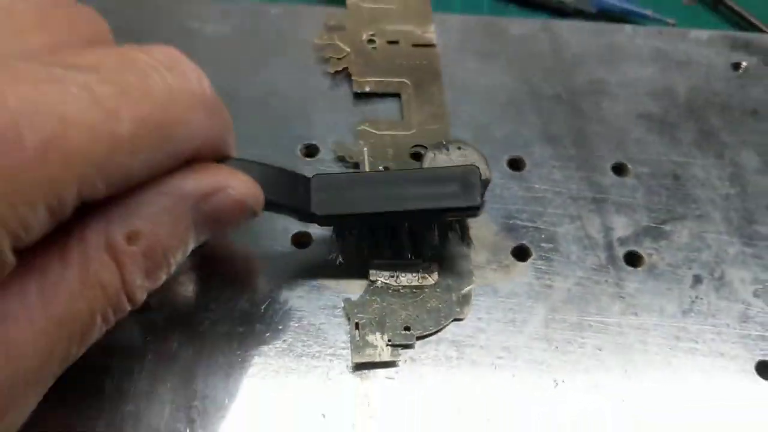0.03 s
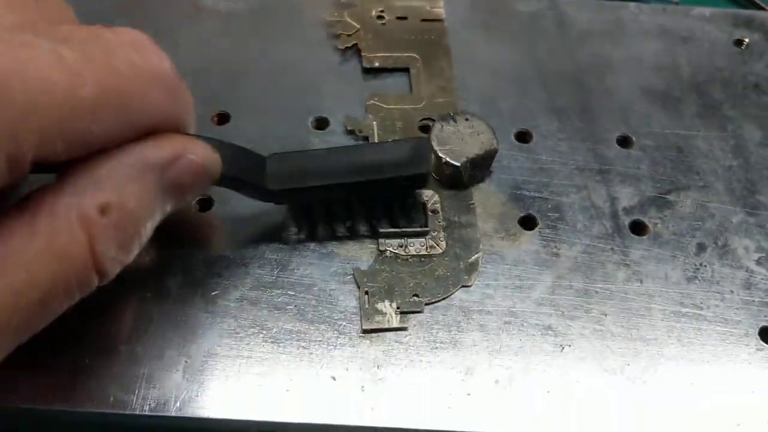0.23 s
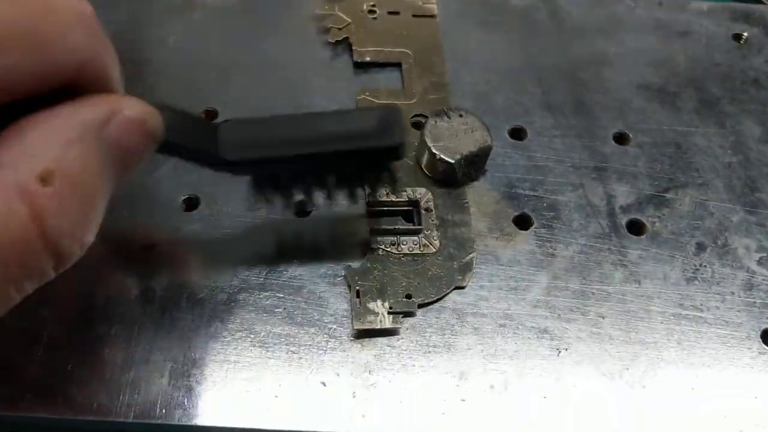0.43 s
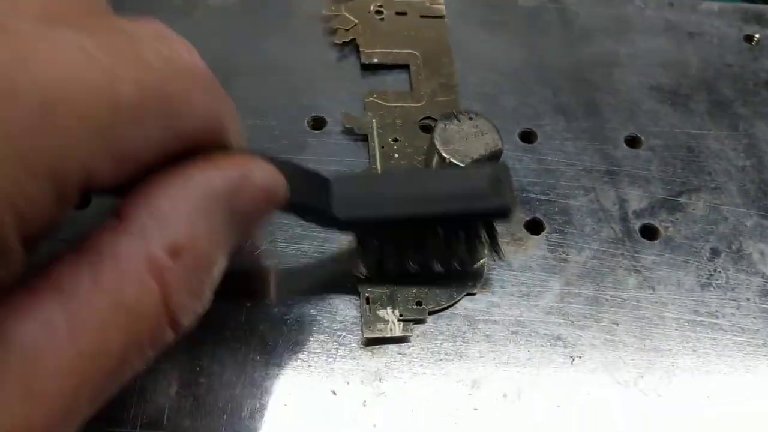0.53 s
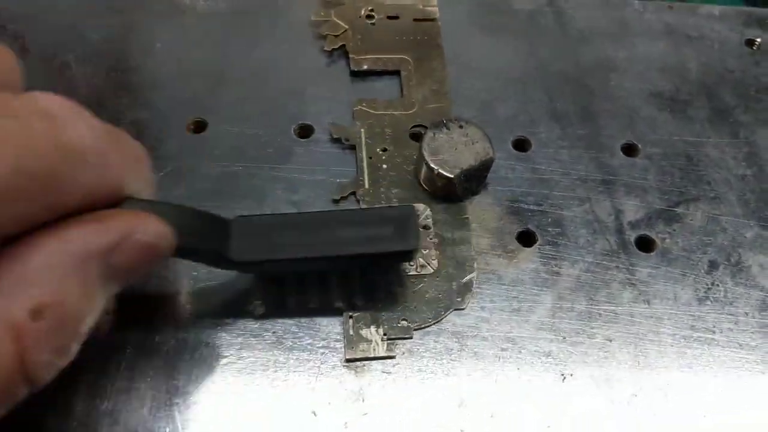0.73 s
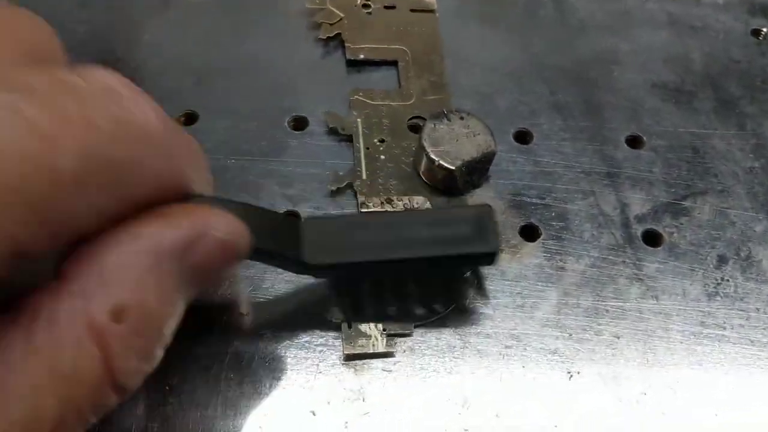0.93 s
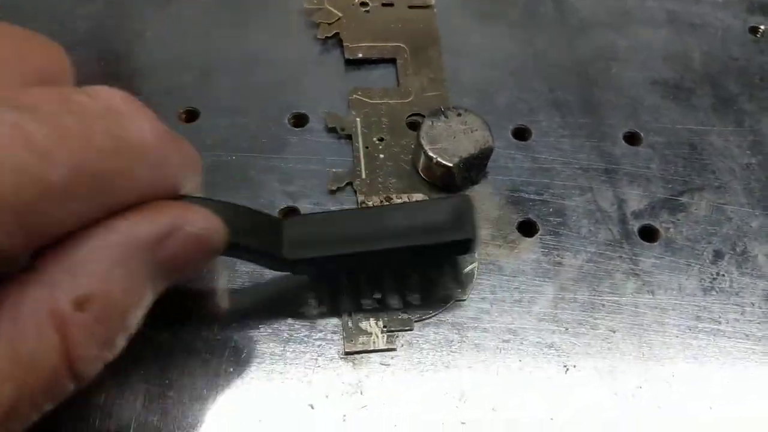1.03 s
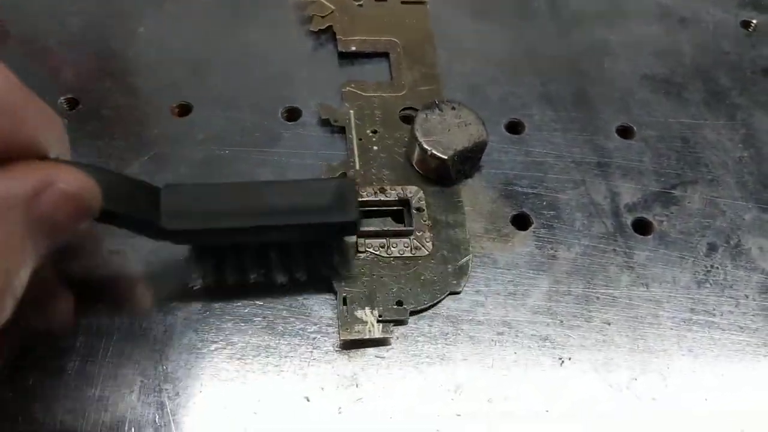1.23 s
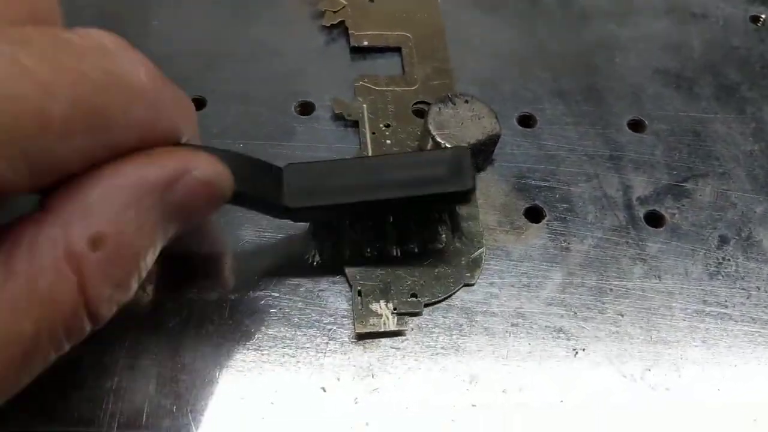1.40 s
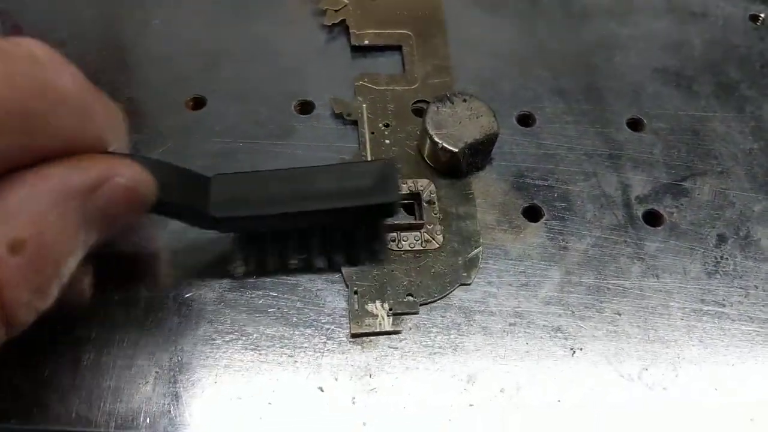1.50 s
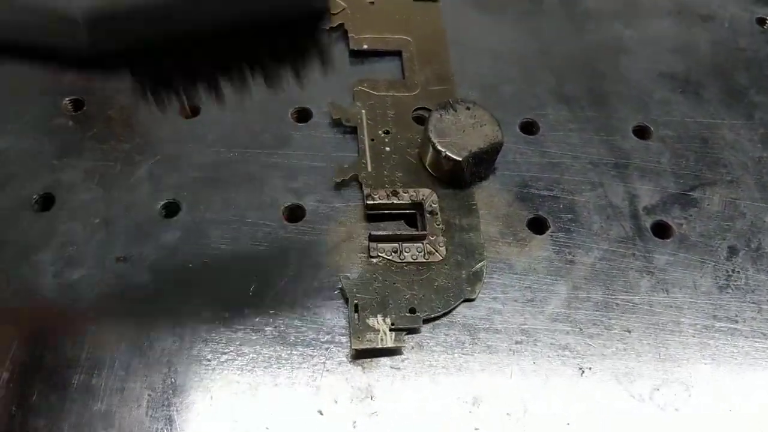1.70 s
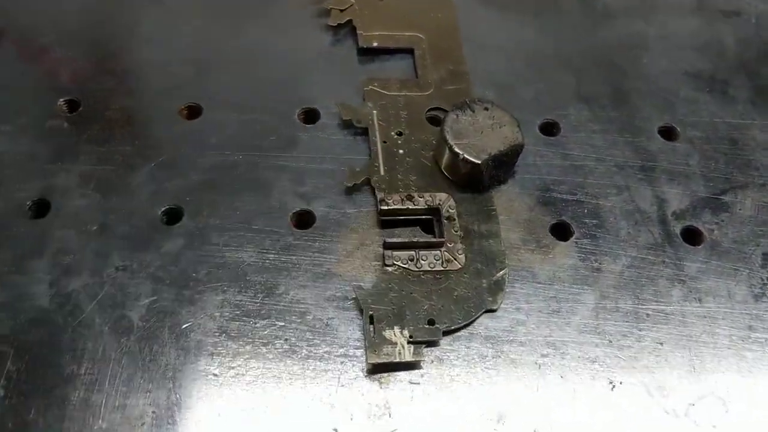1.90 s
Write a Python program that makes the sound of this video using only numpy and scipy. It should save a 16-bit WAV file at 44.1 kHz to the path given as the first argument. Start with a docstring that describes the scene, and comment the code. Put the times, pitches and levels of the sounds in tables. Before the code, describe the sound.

Bright, gritty bristle scrubbing on brass, four short strokes with faint metallic rings and bench knocks

```python
"""Brush scrubbing brass on a steel plate

A small stiff brush scrubs a brass part lying on a steel plate on a workbench: four strokes in a small quiet room.
Stick-slip of the bristles is a dense random impulse train; it ticks the bristles and drives the modes of both metals.
Single bristles snap at the edges as bright noise bursts, and now and then one ring of the metal stands out.
The hand's push rumbles, and bumps knock, through decaying modes of the bench; noise tails make the room.
"""
import sys
import numpy as np
from scipy import signal
from scipy.fft import rfft, irfft
from scipy.io import wavfile

SR = 44100
rng = np.random.default_rng(int(sys.argv[2]) if len(sys.argv) > 2 else 0)


def to_wav(s):
    """Save 16-bit WAV."""
    ch = np.atleast_2d(s).T  # columns
    pcm = np.round(np.clip(ch, -1, 1) * 32767)  # PCM
    wavfile.write(sys.argv[1], SR, pcm.astype(np.int16))


N = 85995
T = np.arange(N) / SR

# Background noise spectrum. Each row: frequency in Hz, relative level in dB.
FLOOR_SPECTRUM = [(25, -59), (45, -16), (70, 2.5), (170, -9), (350, -5.5), (700, -13.5), (1500, -15),
                  (4000, -18.5), (9000, -21.5), (16000, -28)]
# Decay of the room's tail. Each row: frequency in Hz, t60 in seconds.
ROOM_DECAY = [(200, 0.97), (1500, 0.46), (5000, 0.36), (10000, 0.38), (16000, 0.073)]
# Modes of the bench top. Each row: frequency in Hz, relative level in dB, t60 in seconds.
BENCH_MODES = [(75, -13.5, 0.1), (85, -11.5, 0.093), (134, -1, 0.071), (157.4, -4, 0.16), (201.3, -3, 0.46),
               (281, -11, 0.09), (338.3, -11.5, 0.13), (384.7, -9, 0.11), (515, -22, 0.48)]
# Modes of a bump's thud in the bench. Each row: frequency in Hz, relative level in dB, t60 in seconds.
THUD_MODES = [(153.4, -6.5, 0.22), (171, -3.5, 0.22), (204.8, -18, 0.49), (352, -17.5, 0.97),
              (555, -25, 0.9)]
# Deep sway modes of the bench. Each row: frequency in Hz, relative level in dB, t60 in seconds.
SWAY_MODES = [(66.4, 19.5, 0.17), (99.4, 7, 0.2)]
# Spectrum of a clack. Each row: frequency in Hz, relative level in dB per Hz.
CLACK_SPECTRUM = [(100, -10), (350, 0), (600, 0), (850, -4), (1300, -2), (2200, -6), (4000, -22),
                  (15000, -45)]
# The part and brush head bumping down.
# Each row: start in seconds, thud level in dB, clack level in dB, sway level of the bench in dB.
KNOCKS = [(0.119, -34, -39, -28), (.32, -23, -39, -26), (0.449, -17.5, -22.5, -34), (.495, -33, -32, -25.5),
          (.645, -32, -30.5, -19.5), (0.694, -19.5, -43, -27), (.905, -22.5, -40, -22.5),
          (0.951, -36, -32.5, -27), (1.038, -24.5, -33, -20.5), (1.25, -25.5, -54, -23),
          (1.333, -42, -27, -49), (1.392, -45, -26, -20), (1.445, -26, -39, -24),
          (1.565, -16.5, -36, -17.5), (1.621, -14, -25.5, -21), (1.645, -9, -21.5, -37),
          (1.742, -30, -33, -31)]
# The brush catches an edge and picks out one ring of the metal.
# Each row: start in seconds, level in dB, frequency in Hz, t60 in seconds.
PINGS = [(.208, -27, 3978, .1), (0.248, -25, 3978, .12), (.37, -17.5, 2318, 0.38),
         (0.449, -19.5, 1425, 0.24), (.67, -30.5, 515, 0.39), (.712, -15, 1425, 0.22),
         (0.873, -16.5, 1421, 0.21), (1.15, -18, 2318, 0.56), (1.325, -17, 3978, 0.14),
         (1.334, -23.5, 370, .2), (1.39, -26.5, 370.6, 0.18), (1.417, -17, 3978, .25),
         (1.568, -9, 1425, 0.21), (1.625, -11, 3978, .17), (1.646, -18, 1425, 0.28),
         (1.665, -25.5, 5742, 0.44), (1.835, -31, 3160, 1.2)]
# Modes of the steel plate. Each row: frequency in Hz, relative level in dB, t60 in seconds.
PLATE_MODES = [(982.2, -13, 0.47), (1391, -11, 0.6), (1425, 1, 0.27), (1480, -13.5, 1), (1950, -12.5, 0.25),
               (2077, -17.5, .2), (2318, -7, 0.55), (2583, -13.5, 0.1), (3135, -19, 0.56),
               (3978, -3.5, 0.13), (5742, -13.5, 0.47), (6713, -12, 0.26), (9600, -5, 0.19),
               (10700, -27, 0.14)]
# Modes of the brass part. Each row: frequency in Hz, relative level in dB, t60 in seconds.
BRASS_MODES = [(1662, -15.5, 0.062), (3089, -5, 0.059), (3153.5, -5.5, 0.045), (3243, -7.5, 0.047),
               (3530, -18, 0.0046), (3814, -8.5, .08), (3995, -2.5, 0.032), (4240, -10, 0.055),
               (4740, 1, 0.017), (4635, -4, 0.024), (4892, -1.5, 0.016), (5640, -9, 0.047),
               (6760, -15, 0.07), (7560, -10.5, 0.072)]
# Resonances of a bristle. Each row: frequency in Hz, half-width in Hz, lift in dB.
BRISTLE_RESONANCES = [(6660, 180, 7), (9150, 150, 10), (12000, 500, -3), (14600, 830, 4)]
# Single bristles snapping free.
# Each row: start in seconds, tick level in dB, tick pitch in Hz, kick to the brass in dB before its trim.
SNAPS = [(0.0667, -32.5, 7300, -38), (0.097, -44, 8500, -29), (.108, -29, 8500, -25),
         (0.134, -30, 7900, -44), (0.149, -45, 7600, -40), (0.2069, -15, 7740, -16.5),
         (.273, -26, 7100, -23), (0.3092, -18, 7040, -10), (0.348, -21.5, 11100, -10),
         (0.386, -18, 7950, -11), (0.4173, -17, 14100, -12), (0.438, -17.5, 13900, -16.5),
         (0.632, -28, 6940, -36), (0.643, -26.5, 9500, -48), (.659, -23, 13300, -18),
         (.698, -25, 7000, -16), (.7058, -17, 10300, -7.5), (.73, -18.5, 7050, -7),
         (0.79, -18.5, 12200, -8), (0.824, -20, 7140, -12), (0.854, -28, 10200, -32),
         (0.87, -17, 12800, -18), (1.0247, -27, 15000, -41), (1.039, -22.5, 13100, -39),
         (1.1199, -17.5, 7550, -21), (1.2443, -16.5, 11000, -38), (1.257, -15, 10950, -6.5),
         (1.279, -20, 14700, -25), (1.292, -14, 10900, -36), (1.36, -18.5, 15100, -28),
         (1.369, -20.5, 11500, -28), (1.4164, -22, 11500, -22), (1.461, -21.5, 14500, -41),
         (1.4729, -15.5, 7100, -19), (1.5105, -8.5, 10140, -16), (1.5129, -7.5, 10600, -10.5),
         (1.5642, -25, 6860, -8.5), (1.568, -16, 7100, -1.5)]
# Spectrum of a bristle's tick. Each row: frequency in Hz, relative level in dB per Hz.
CRACKLE_SPECTRUM = [(300, -19), (800, 0), (1500, -15), (2800, 3), (5300, 3.5), (6200, 10), (7200, 14),
                    (8800, 6.5), (10300, 9.5), (12500, 5), (15500, 5)]
# Four strokes, one list each; all levels are before the trims.
# Each row: time in seconds, bristle crackle in dB, drive of the brass in dB, drive of the steel plate in dB.
STROKES = [
    [(.06, -75, -71, -60.5), (.11, -55, -51.5, -50), (.165, -58, -58.5, -55), (.24, -45, -50, -59),
     (.32, -37, -37.5, -49), (.42, -42, -43, -43.5), (.46, -43, -45.5, -50), (.5, -60.5, -80, -55),
     (.6, -82, -74, -70)],
    [(.625, -83, -76, -72), (.645, -48, -52, -62), (.695, -58, -58, -45), (.72, -39.5, -36, -38.5),
     (.8, -37, -40.5, -46), (.885, -41.5, -39, -44), (.92, -50, -68, -64), (.96, -59, -74, -57.5),
     (1, -82, -74, -68)],
    [(1.02, -51, -50.5, -42.5), (1.04, -46, -44, -51), (1.085, -49.5, -51.5, -41), (1.15, -35.5, -32, -45),
     (1.26, -39.5, -42.5, -35.5), (1.285, -44, -76, -51), (1.34, -49, -55, -56), (1.37, -42.5, -51, -51),
     (1.41, -48.5, -48.5, -51), (1.495, -54, -64, -45.5)],
    [(1.51, -46, -57, -44), (1.545, -37, -42, -47), (1.57, -38, -33.5, -29.5), (1.61, -37.5, -35, -46),
     (1.64, -31.5, -42.5, -38), (1.675, -73, -62, -47.5), (1.72, -57, -91, -55.5), (1.8, -70, -79, -56)],
]

FLOOR_DB = -63
ROOM_DB, ROOM_DELAY_S = -10.5, 0.008
NEAR_DB, NEAR_T60_S, NEAR_DELAY_S = -5.5, 0.077, 0.002
RUMBLE_DB, FULL_DRIVE_DB = -55, -30.5  # rumble level where the drive of the brass is full
RUMBLE_FOLLOW = 0.25  # dB of rumble per dB of drive: it grows slowly with the push
CLACK_T60_S, THUD_RISE_S = 0.07, 0.014
KNOCK_RINGS_DB = 5  # a clack's drive of the plate, above its own level
PING_RISE_S = 0.0061
CONTACT_DB, CONTACT_S = 2, 0.025  # depth and time scale of the changing feed of each mode
MODE_RISE_S, MODE_LAG_S = 0.0004, 0.002  # swell of a mode and its longest delay
SNAP_T60_S, SNAP_PEAK_DB, SNAP_WIDTH_HZ, SNAP_LOW_HZ = 0.018, 13.5, 390, 5250
FLICKS_PER_S = 2600
FLICK_SPREAD_DB, HARDEST = 4.5, 3  # dB per unit of hardness, and the cap on hardness
CLUMP_DB, CLUMP_S = 2.5, 0.0025
BRISTLE_T60_S, BRISTLE_COLOUR_DB, BRISTLE_COLOUR_HZ = 0.009, 5, 700
TUFT_DB, TUFT_S = 2, 0.013  # different bristles take over as the brush travels
CRACKLE_DB, BRASS_DB, PLATE_DB = -6, -4.5, -4  # trims of the three layers
LOW_CUT_HZ, EDGE_HZ = 70, 15850


def amp(db):
    """Decibels to gain: twenty decibels are a factor of ten in amplitude."""
    return 10 ** (np.asarray(db) / 20)


def evened(x):
    """Power normalisation: scales to rms 1."""
    return x / np.sqrt(np.mean(x ** 2) + 1e-20)


def unit(x):
    """Energy normalisation: scales to energy 1."""
    return x / (np.linalg.norm(x) + 1e-20)


def read(points, hz):
    """Interpolation on a log-frequency axis, as hearing spaces pitch."""
    f, value = np.transpose(points)
    return np.interp(np.log(hz + 1), np.log(f + 1), value)


def add(mix, s, sound):
    """Superposition: adds a sound into the mix at s seconds."""
    part = mix[max(round(s * SR), 0):][:len(sound)]
    part += sound[:len(part)]


def through(x, response):
    """Linear response: convolves a drive with an impulse response, cut to the scene's length."""
    return signal.oaconvolve(x, response)[:N]


def wander(size, span):
    """Smooth random variation: low-passed noise of rms 1 that changes over span samples."""
    low_pass = np.exp(-(np.fft.rfftfreq(size) * span * 2) ** 2)
    return evened(irfft(rfft(rng.standard_normal(size)) * low_pass, size))


def burst(colour_db, t60, size=4096):
    """A dying scratch of energy 1: random phases under the spectrum colour_db(hz), decaying exponentially."""
    phases = np.exp(2j * np.pi * rng.random(size // 2 + 1))
    noise = irfft(phases * amp(colour_db(np.fft.rfftfreq(size, 1 / SR))))
    return unit(noise * amp(-60 * T[:size] / t60))


def ring(modes):
    """Modal impulse response: one tap excites decaying cosines, each weighted by its level in dB."""
    t = T[:SR]
    total = np.zeros(SR)
    for k, (hz, db, t60) in enumerate(modes):
        mode = unit(amp(-60 * t / t60) * np.cos(2 * np.pi * hz * t))
        total += (-1) ** k * amp(db) * mode  # neighbouring modes have opposite signs
    return unit(total)


def swell(rise_s):
    """Exponential build-up: a resonance approaches full motion with time constant rise_s."""
    return 1 - np.exp(-T[:SR] / rise_s)


def floor():
    """Stationary noise: white noise shaped into steady low room noise and hiss."""
    colour = amp(read(FLOOR_SPECTRUM, np.fft.rfftfreq(N, 1 / SR)))
    return amp(FLOOR_DB) * evened(irfft(rfft(rng.standard_normal(N)) * colour, N))


def room(x):
    """Reverberation as decaying noise: quick reflections off the bench and things on it, and a faint tail."""
    hz, frame_s, bands = signal.stft(rng.standard_normal(SR), SR, nperseg=256)
    decay = amp(-60 * frame_s / read(ROOM_DECAY, hz)[:, None])
    tail = signal.istft(bands * decay, SR, nperseg=256)[1][:SR]
    t = T[:SR]
    near = rng.standard_normal(SR) * amp(-60 * t / NEAR_T60_S)
    late = amp(ROOM_DB) * unit(tail * (t > ROOM_DELAY_S))
    early = amp(NEAR_DB) * unit(near * (t > NEAR_DELAY_S))
    return x + through(x, late + early)


def bench(drive_db):
    """Forced and free vibration: the hand's push rumbles in the bench; bumps give clack, thud and sway."""
    push = amp(RUMBLE_DB + RUMBLE_FOLLOW * (drive_db - FULL_DRIVE_DB))
    out = through(rng.standard_normal(N) * push, ring(BENCH_MODES))
    thud = unit(ring(THUD_MODES) * swell(THUD_RISE_S))
    sway = unit(ring(SWAY_MODES) * swell(THUD_RISE_S))
    for s, thud_db, clack_db, sway_db in KNOCKS:
        clack = burst(lambda hz: read(CLACK_SPECTRUM, hz), CLACK_T60_S)
        add(out, s, amp(thud_db) * thud + amp(sway_db) * sway)
        add(out, s, amp(clack_db) * clack)
    return out


def knock_impulses():
    """Impulsive excitation: each clack strikes the plate with a one-sample blow."""
    blows = np.zeros(N)
    for s, thud_db, clack_db, sway_db in KNOCKS:
        add(blows, s, amp([clack_db + KNOCK_RINGS_DB]))
    return blows


def pings():
    """Selective excitation: single modes of the metal swell briefly and die."""
    out = np.zeros(N)
    for s, db, hz, t60 in PINGS:
        add(out, s, amp(db) * unit(ring([(hz, 0, t60)]) * swell(PING_RISE_S)))
    return out


def rubbed(drive, modes):
    """Modal coupling: a moving contact feeds each mode by a changing amount, each a moment late."""
    shares = unit(amp([db for hz, db, t60 in modes]))
    out = np.zeros(N)
    for share, mode in zip(shares, modes):
        contact = evened(amp(CONTACT_DB * wander(N, CONTACT_S * SR)))
        response = unit(ring([mode]) * swell(MODE_RISE_S))
        add(out, rng.random() * MODE_LAG_S, share * through(drive * contact, response))
    return out


def snaps():
    """Release of stored bending energy: bristles spring off an edge, ticking brightly and kicking the brass."""
    ticks, kicks = np.zeros(N), np.zeros(N)
    for s, db, pitch, kick_db in SNAPS:
        peaks = BRISTLE_RESONANCES + [(pitch, SNAP_WIDTH_HZ, SNAP_PEAK_DB)]

        def colour(hz):
            """Resonance peaks over the tick spectrum, with the lows rolled off."""
            lifts = sum(lift / (1 + ((hz - f) / width) ** 2) for f, width, lift in peaks)
            low_loss = 10 * np.log10(1 + (SNAP_LOW_HZ / (hz + 1)) ** 4)
            return read(CRACKLE_SPECTRUM, hz) + lifts - low_loss

        add(ticks, s, amp(db) * burst(colour, SNAP_T60_S))
        add(kicks, s, amp([kick_db]))
    return ticks, kicks


def flicks():
    """Stick-slip as a random impulse train: bristles slip in clumps, a few much harder than the rest."""
    hardness = np.minimum(rng.exponential(1, N), HARDEST)
    clumps = np.clip(wander(N, CLUMP_S * SR), -2, 2)
    size = amp(FLICK_SPREAD_DB * hardness + CLUMP_DB * clumps)
    direction = rng.choice([-1, 1], N)
    slipping = rng.random(N) < FLICKS_PER_S / SR
    return evened(size * direction * slipping)


def crackle(slips, count=16):
    """Sum of impulse responses: each slip ticks one bristle, with its own colour and changing contact."""
    def colour(hz):
        """The tick spectrum with random lifts and dips."""
        return read(CRACKLE_SPECTRUM, hz) + BRISTLE_COLOUR_DB * wander(len(hz), BRISTLE_COLOUR_HZ / hz[1])

    which = rng.integers(0, count, N)
    out = np.zeros(N)
    for k in range(count):
        tick = burst(colour, BRISTLE_T60_S)
        contact = evened(amp(TUFT_DB * wander(N, TUFT_S * SR)))
        out += through(slips * (which == k) * contact, tick)
    return out


def scene():
    """Common excitation: the same slips drive bristles, brass and the plate under it; knocks ring the plate."""
    s, *levels = np.concatenate(STROKES).T
    crackle_db, brass_db, plate_db = (np.interp(T, s, level, left=-90, right=-80) for level in levels)
    slips = flicks()
    ticks, kicks = snaps()
    bristles = amp(CRACKLE_DB) * crackle(slips * amp(crackle_db)) + ticks
    brass = amp(BRASS_DB) * rubbed(slips * amp(brass_db) + kicks, BRASS_MODES)
    plate = amp(PLATE_DB) * rubbed(slips * amp(plate_db) + knock_impulses(), PLATE_MODES)
    # only the bristles and the brass excite the room
    return (floor() + bench(brass_db) + pings() + plate + room(bristles + brass))[None]


def record(dry):
    """Band limiting: the microphone's low cut and the recorder's upper edge."""
    low_cut = signal.butter(4, LOW_CUT_HZ, "high", fs=SR, output="sos")
    thin = signal.sosfilt(low_cut, dry)
    band_limit = signal.firwin(301, EDGE_HZ, window=("kaiser", 8), fs=SR)
    return signal.oaconvolve(thin, band_limit[None], "same")


dry = scene()
out = record(dry)
to_wav(out)
```